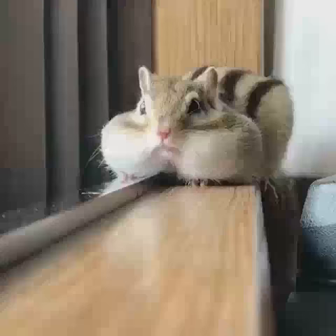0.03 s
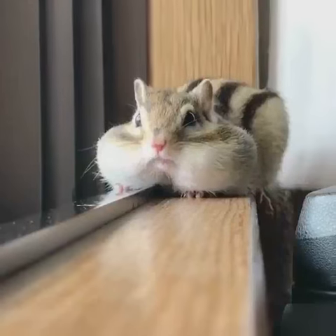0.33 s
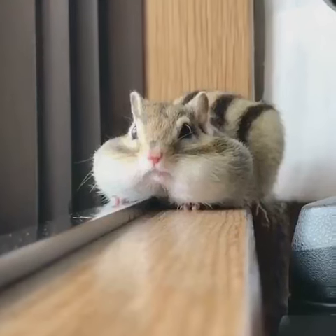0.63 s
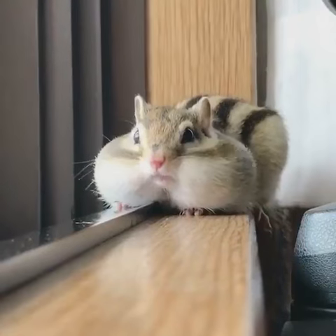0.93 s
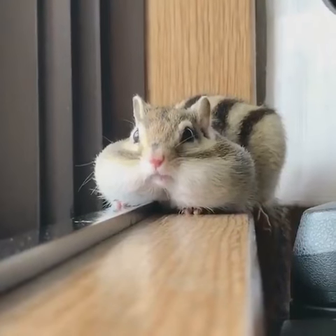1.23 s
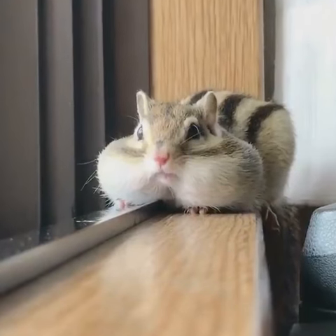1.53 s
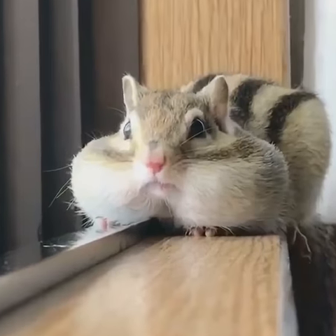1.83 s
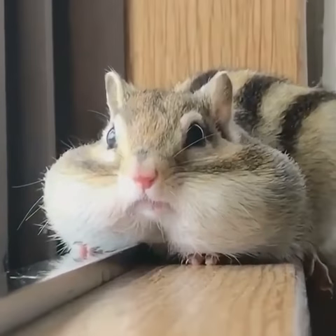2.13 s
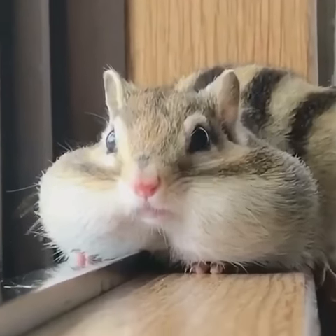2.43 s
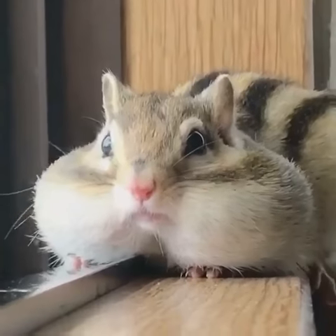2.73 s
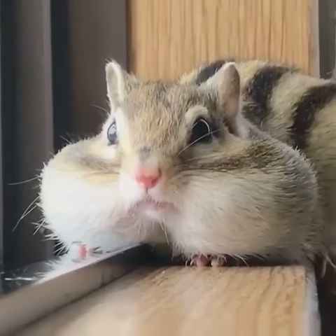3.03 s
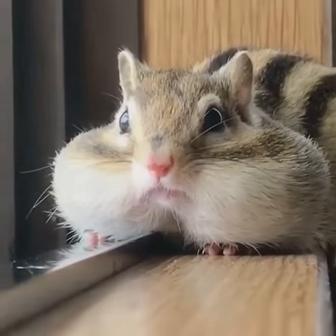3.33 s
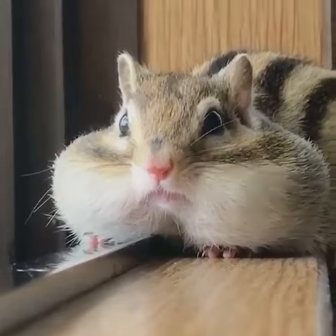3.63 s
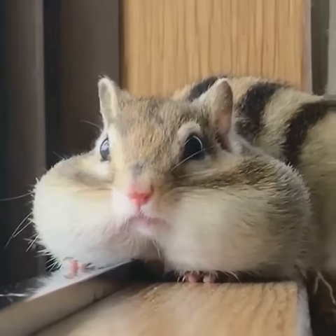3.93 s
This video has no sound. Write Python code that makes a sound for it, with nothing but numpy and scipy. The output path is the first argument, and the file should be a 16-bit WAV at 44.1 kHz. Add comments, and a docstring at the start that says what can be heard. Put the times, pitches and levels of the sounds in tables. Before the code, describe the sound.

Three brief, high chipmunk chirps close up in a small, quiet room.

```python
"""A chipmunk with full cheeks chirps three times on a wooden sill, close up in a small room.
Each call is a thin falling squeak, a loud, almost pure pip and a softer rising after-note, all in
about a tenth of a second: gliding whistles with overtones shaped by the mouth and a trace of rasp.
Behind it are slowly swelling room noise, the low rumble of a hand-held microphone,
a few faint rustles and thin, airy whistles."""
import sys
import numpy as np
from scipy import signal
from scipy.fft import rfft, irfft
from scipy.io import wavfile
from scipy.ndimage import uniform_filter1d

SR = 44100
rng = np.random.default_rng(int(sys.argv[2]) if len(sys.argv) > 2 else 0)


def digitize_waveform(pressure):
    """Quantize a signal to 16-bit integers and store it at the path in sys.argv[1].

    Rows of a 2-D input are taken as channels; values are limited to [-1, 1].
    """
    field = np.atleast_2d(pressure).T
    bounded = np.clip(field, -1, 1)
    quanta = np.round(bounded * 32767).astype(np.int16)
    wavfile.write(sys.argv[1], SR, quanta)


N = 176400
T = np.arange(N) / SR
CUTOFF_HZ = 13900


def from_db(db):
    """Decibels to gain."""
    return 10 ** (np.asarray(db) / 20)


def curve(rows, at):
    """Straight lines through a table of breakpoints."""
    return np.interp(at, *np.transpose(rows))


def gain_at(spectrum, hz):
    """Gain of an EQ curve (frequency [Hz], level [dB]) on a log-frequency axis."""
    freqs, db = np.transpose(spectrum)
    return from_db(np.interp(np.log(hz + 1), np.log(freqs), db))


def noise(spectrum, size):
    """Noise coloured by an EQ curve, rms 1."""
    hz = np.arange(size // 2 + 1) * SR / size
    coloured = irfft(rfft(rng.standard_normal(size)) * gain_at(spectrum, hz), size)
    return coloured / coloured.std()


def wobble(rate_hz, t):
    """Random modulation at the given rate, spread about 1."""
    return np.interp(t * rate_hz, np.arange(4096), rng.standard_normal(4096))


def add(out, start_s, sound):
    """Mix a sound into a track."""
    i = int(start_s * SR)
    if i < len(out):
        out[i:i + len(sound)] += sound[:len(out) - i]


def gate(t, length_s, attack_s, release_s):
    """Envelope with a rounded attack and release."""
    fade_in = np.sin(np.pi / 2 * np.clip(t / attack_s, 0, 1)) ** 2
    fade_out = np.sin(np.pi / 2 * np.clip((length_s - t) / release_s, 0, 1)) ** 2
    return fade_in * fade_out


def swell(middle_s, length_s):
    """A soft arch of level."""
    return np.cos(np.pi * np.clip((T - middle_s) / length_s, -.5, .5))


def room_noise():
    """A bed of air noise and a faint wavering hum, slowly swelling together."""
    # colour of the air: (frequency [Hz], level [dB])
    air_spectrum = [(100, 3), (160, 1.5), (200, -3), (245, 3), (290, 0), (340, 0), (410, -7.5), (580, -4),
                    (720, -6), (930, -2.5), (1350, -8.5), (1950, -7.5), (2600, -14.5), (3200, -24.5),
                    (4200, -24.5), (5200, -30), (7000, -32.5), (9500, -37), (12000, -41.5), (13800, -46)]
    # swell of the air: (time [s], level [dB])
    air_level = [(.17, -49), (.6, -45.5), (.9, -46.5), (1.3, -45.5), (2.2, -43.5), (3.0, -43), (4, -41.5)]
    hum_hz = 228 + 3 * wobble(12, T)
    hum = from_db(-58) * np.sqrt(2) * np.sin(2 * np.pi * np.cumsum(hum_hz) / SR)
    level = from_db(curve(air_level, T))
    return level * noise(air_spectrum, N) + hum * level / level.mean()


def handling():
    """A hand on the microphone makes a lumpy low rumble and a few soft bumps."""
    # colour of the rumble: (frequency [Hz], level [dB])
    rumble_spectrum = [(12, -13), (22, -6.5), (38, 3), (55, 0.5), (80, -9), (120, -13), (180, -21.5),
                       (300, -42), (1200, -100)]
    # rise and fall of the rumble: (time [s], level [dB])
    rumble_level = [(.18, -33), (.35, -34.5), (.45, -38), (.72, -38), (.9, -45), (1.06, -31.5), (1.22, -36),
                    (1.45, -40.5), (1.73, -35), (1.87, -39.5), (2.2, -34), (2.65, -35), (2.78, -40),
                    (2.95, -33), (3.2, -36), (3.7, -37), (3.95, -33)]
    # bumps of the hand: (time [s], level [dB], pitch [Hz])
    bumps = [(0.191, -23, 62), (0.309, -31, 127), (1.305, -20.5, 67.5), (2.09, -32.5, 157),
             (2.498, -19.5, 51), (3.011, -24.5, 48)]
    rumble = noise(rumble_spectrum, N)
    running_rms = np.sqrt(uniform_filter1d(rumble ** 2, size=6000))
    out = rumble / running_rms * from_db(curve(rumble_level, T))
    t = T[:SR // 10]
    envelope = gate(t, length_s=.039, attack_s=.019, release_s=.029)
    for start_s, db, hz in bumps:
        add(out, start_s, -from_db(db) * np.sin(2 * np.pi * hz * t) * envelope)
    return out


def whistles():
    """Faint, airy whistles: swells of hiss in one narrow band."""
    # swells of the whistle: (middle [s], length [s], level [dB])
    swells = [(0.34, .19, -74), (0.63, .22, -73.5), (2.23, .11, -74), (3.06, .09, -73), (3.575, .13, -71),
              (3.84, .08, -71.5)]
    centre_hz, half_width_hz = 6000, 120
    edges_hz = [centre_hz - half_width_hz, centre_hz + half_width_hz]
    band = signal.butter(2, edges_hz, "band", fs=SR, output="sos")
    air = signal.sosfilt(band, rng.standard_normal(N))
    level = sum(from_db(db) * swell(middle_s, length_s) for middle_s, length_s, db in swells)
    return air / air.std() * level


def rustles():
    """Brief, soft swells of flickering high noise, each with its own blend of body and hiss."""
    # the rustles: (middle [s], length [s], level [dB], share of bright hiss [0-1])
    swells = [(0.35, 0.19, -66.5, 0.33), (2.242, 0.12, -64.5, 0), (3.575, 0.11, -61, 0.3)]
    # colour of the body: (frequency [Hz], level [dB])
    body_spectrum = [(2500, -45), (4500, -16), (5600, -7), (6050, 1), (6500, -3), (7200, -3), (8500, -12),
                     (13000, -26)]
    # colour of the bright hiss: (frequency [Hz], level [dB])
    hiss_spectrum = [(2500, -45), (5000, -12), (7500, -7), (9800, 4), (11800, 3.5), (14000, -10)]
    body, hiss = noise(body_spectrum, N), noise(hiss_spectrum, N)
    out = np.zeros(N)
    for middle_s, length_s, db, bright in swells:
        blend = np.sqrt(1 - bright) * body + np.sqrt(bright) * hiss
        out += from_db(db) * swell(middle_s, length_s) * blend
    flicker_db = 1.2 * wobble(120, T)
    return out * from_db(flicker_db)


def room_reverb(sound):
    """The small room returns a few close echoes and a short diffuse tail, both a little dull."""
    # echoes from nearby surfaces: (delay [s], level [dB])
    echoes = [(.0125, -21), (.0235, -29), (.038, -19.5)]
    t60_s, build_s, tail_db, lowpass_hz = .32, .014, -18, 7500
    t = T[:SR // 2]
    tail = rng.standard_normal(len(t)) * from_db(-60 * t / t60_s) * np.clip(t / build_s, 0, 1)
    response = from_db(tail_db) * tail / np.sqrt(np.sum(tail ** 2))
    for delay_s, db in echoes:
        add(response, delay_s, from_db([db]))
    lowpass = signal.butter(1, lowpass_hz, fs=SR, output="sos")
    return signal.sosfilt(lowpass, signal.fftconvolve(sound, response)[:N])


def note(pitch, ratio, length_s, attack_s, release_s, tone_db, sag_db,
         overtone_db, half_db, rasp_db, treble_db, swell_db, jitter):
    """A gliding whistle; its edge of overtones, half-order partials and rasp swells or fades."""
    # overtones as the mouth shapes them: (frequency [Hz], level [dB])
    mouth = [(1000, -4), (2200, -19), (2800, -4), (3150, -2), (3650, -28), (4100, -2), (4750, 6),
             (5300, -3.5), (5800, -5), (6400, -8), (7100, -43), (7800, -18), (9000, -18), (10300, -19.5),
             (13000, -33)]
    # colour of the rasp: (frequency [Hz], level [dB])
    rasp_spectrum = [(300, -24), (900, -4), (1800, 12), (2700, 3), (3400, -7), (4400, 1), (6000, -1),
                     (7200, -15), (8800, -9), (10800, -8), (13500, -20)]
    flutter_db, wander_rad, treble_hz = 3.5, .8, 7000
    t = np.arange(2048) / SR
    progress = np.clip(t / length_s, 0, 1)
    hz = ratio * curve(pitch, progress)
    phase = 2 * np.pi * np.cumsum(hz * (1 + jitter * wobble(1566, t))) / SR

    def partial(k):
        """A sine at k times the pitch, unsteady in level and phase."""
        flutter = from_db(flutter_db * wobble(165, t))
        wander = 2 * np.pi * rng.random() + wander_rad * wobble(160, t)
        shelf = from_db(treble_db * (k * hz > treble_hz))
        colour = shelf * gain_at(mouth, k * hz) * (k * hz < CUTOFF_HZ)
        return flutter * colour * np.sin(k * phase + wander)

    tone = from_db(tone_db - sag_db * progress) * np.sin(phase) * gate(t, length_s, attack_s, release_s)
    overtones = sum(partial(k) for k in range(2, 10))
    halves = sum(partial(k + .5) for k in range(1, 8))
    rasp = noise(rasp_spectrum, len(t)) * (1 + .5 * np.sin(phase))  # pulses with each cycle
    edge = from_db(overtone_db) * overtones + from_db(half_db) * halves + from_db(rasp_db) * rasp
    effort = gate(t, length_s, attack_s=.0035, release_s=.003) * from_db(swell_db * (progress - .5))
    return tone + edge * effort


def chipmunk():
    """Three chirps, each a thin falling squeak, a loud pip and a rising, fading after-note."""
    # the calls: (pip start [s], level [dB], pip length [s], pitch ratio [x],
    # squeak lead [s], after-note delay [s])
    chirps = [(0.7502, 0, .0218, 1.008, .0146, .0602), (2.3858, 0, .0265, .998, .0120, .0635),
              (3.9838, 0, .025, 1.0, .0118, .063)]
    # fall of the squeak: (progress [0-1], base pitch [Hz])
    squeak_pitch = [(0, 3100), (.35, 2590), (.65, 2470), (1, 2330)]
    # shallow dip of the pip: (progress [0-1], base pitch [Hz])
    pip_pitch = [(0, 1475), (.25, 1442), (.6, 1436), (1, 1480)]
    # rise of the after-note: (progress [0-1], base pitch [Hz])
    after_pitch = [(0, 1100), (.25, 1185), (.55, 1335), (.75, 1375), (1, 1335)]
    out = np.zeros(N)
    for start_s, db, pip_s, ratio, lead_s, delay_s in chirps:
        squeak = note(squeak_pitch, ratio, length_s=.016, attack_s=.005, release_s=.005,
                      tone_db=-33, sag_db=0, overtone_db=-45, half_db=-66, rasp_db=-50,
                      treble_db=1.5, swell_db=-5, jitter=.008)
        pip = note(pip_pitch, ratio, length_s=pip_s, attack_s=.005, release_s=.0085,
                   tone_db=-11, sag_db=1, overtone_db=-42, half_db=-44, rasp_db=-43,
                   treble_db=-2, swell_db=2, jitter=.009)
        after = note(after_pitch, ratio, length_s=.029, attack_s=.013, release_s=.006,
                     tone_db=-11, sag_db=17, overtone_db=-40.5, half_db=-54.5, rasp_db=-48,
                     treble_db=-11, swell_db=1.5, jitter=.007)
        add(out, start_s - lead_s, from_db(db) * squeak)
        add(out, start_s, from_db(db) * pip)
        add(out, start_s + delay_s, from_db(db) * after)
    return out


def scene():
    """The calls in their room, over the background, in mono."""
    calls = chipmunk()
    return (calls + room_reverb(calls) + room_noise() + handling() + rustles() + whistles())[None]


def record(dry):
    """The sound opens after a moment of silence; a steep low-pass cuts the top."""
    start_s, fade_s = .1744, .0038
    fade_in = np.clip((T - start_s) / fade_s, 0, 1)
    lowpass = signal.ellip(10, .1, 80, CUTOFF_HZ, fs=SR, output="sos")
    return signal.sosfilt(lowpass, dry * fade_in)


dry = scene()
out = record(dry)
digitize_waveform(out)
```